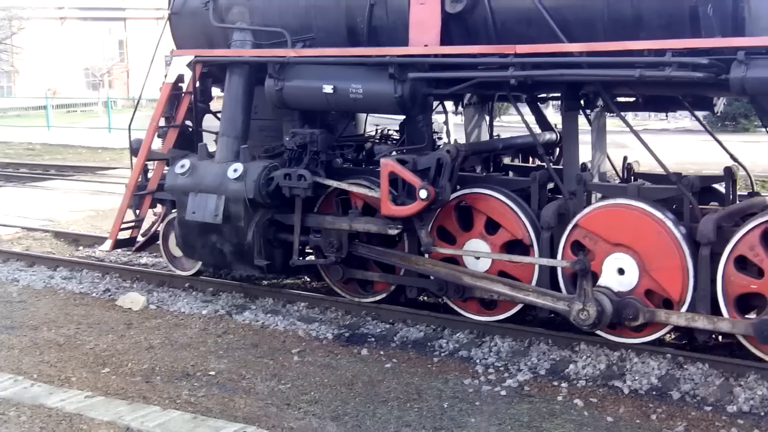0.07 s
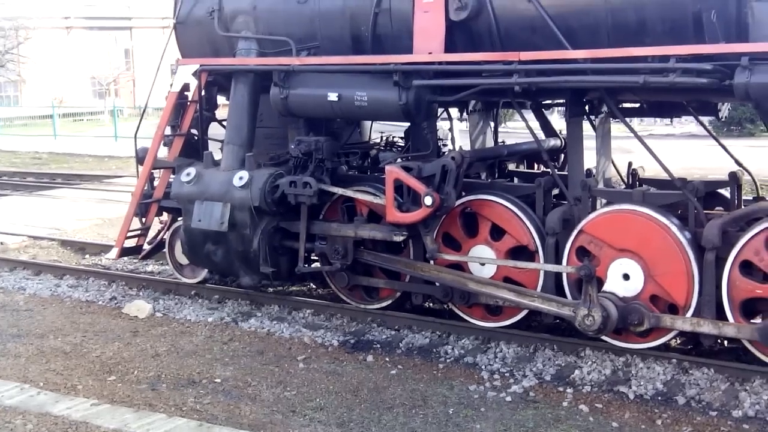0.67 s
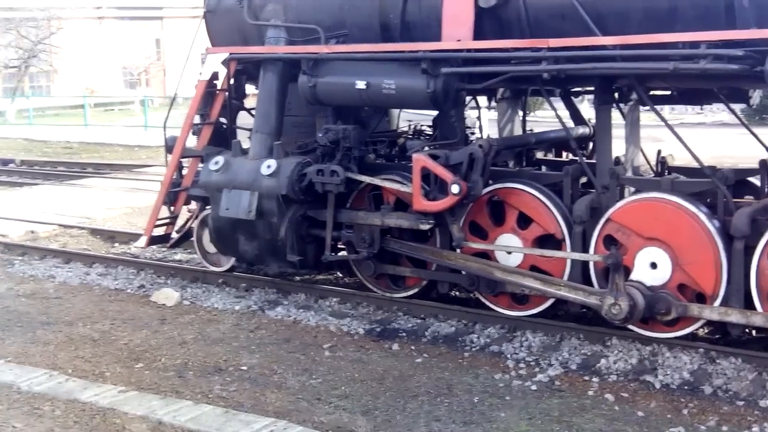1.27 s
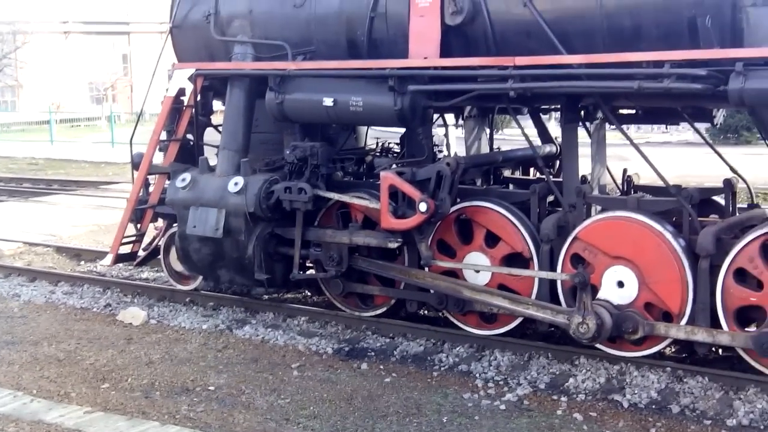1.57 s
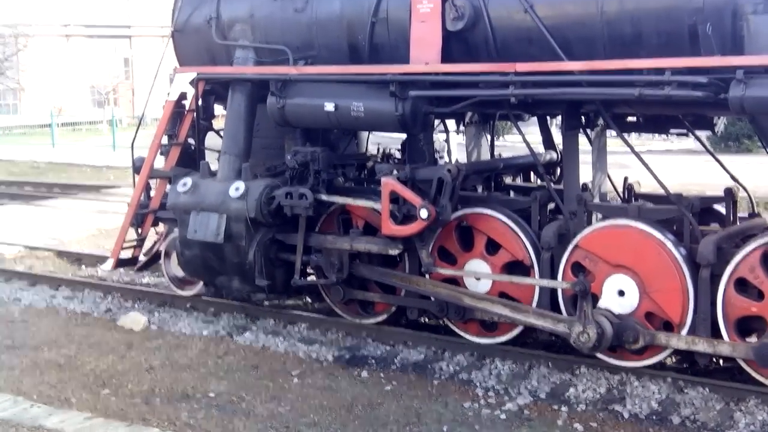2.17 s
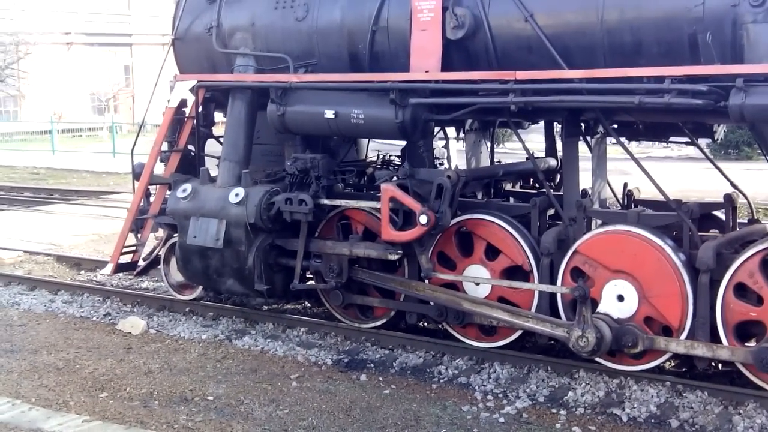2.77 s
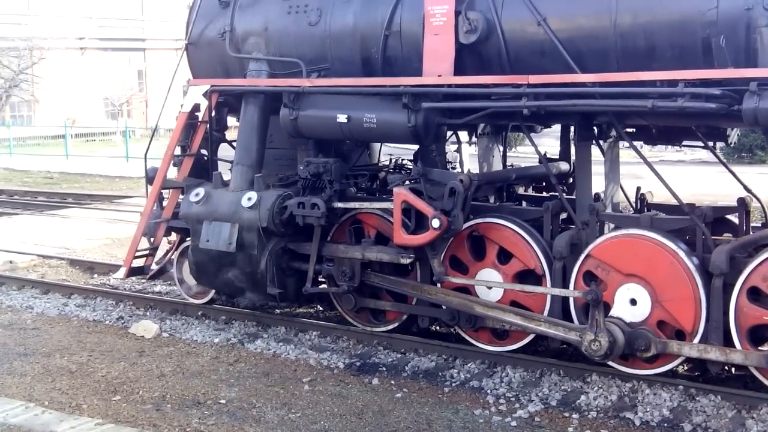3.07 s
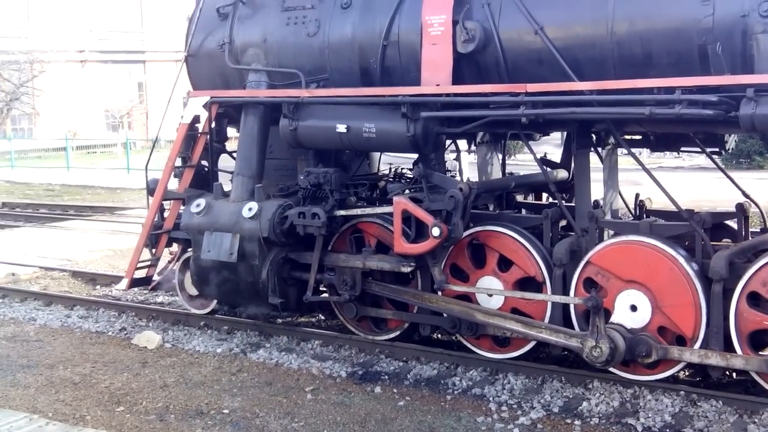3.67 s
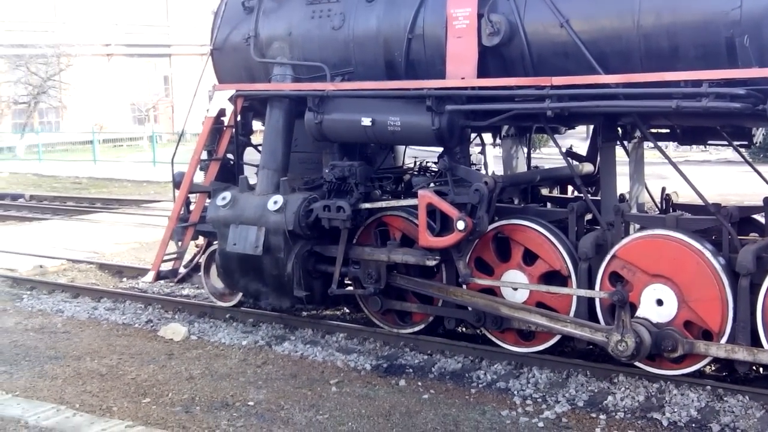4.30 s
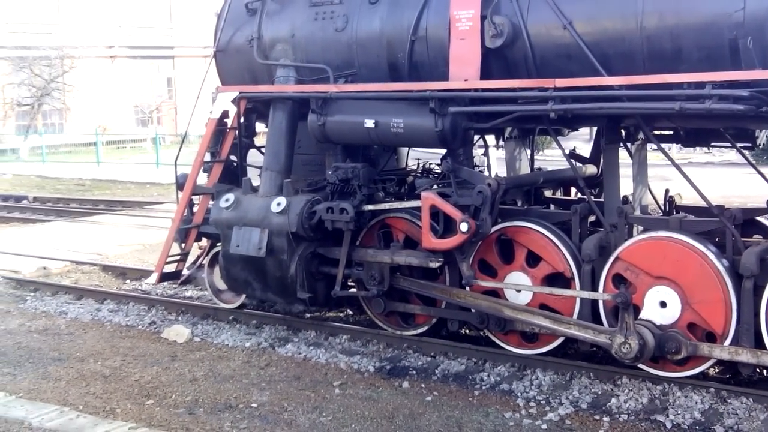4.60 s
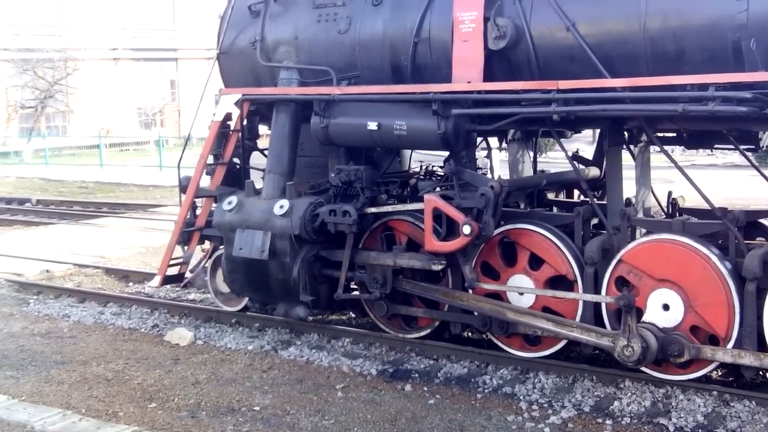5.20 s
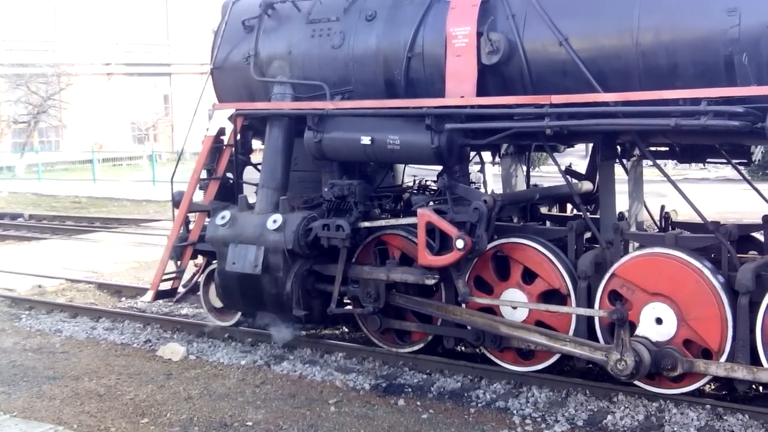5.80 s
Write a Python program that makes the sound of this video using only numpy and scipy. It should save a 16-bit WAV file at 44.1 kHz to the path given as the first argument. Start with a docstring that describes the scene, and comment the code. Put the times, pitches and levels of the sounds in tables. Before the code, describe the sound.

A sudden loud jet of steam from a locomotive eases and dies away to a thin leak, with a pump softly thumping behind.

```python
"""A thin hiss and a few spits, then a blast of steam from low by a standing locomotive's cylinders.
One microphone, outdoors, a few metres from the engine. The valve snaps open, eases back and closes
to a leak; the jet rings the pipe and frame and whistles briefly. Behind it the air pump works
steadily, a thump and a soft chuff of exhaust at each stroke, over the rumble of boiler and yard."""
import sys
import numpy as np
from scipy import signal
from scipy.fft import rfft, irfft
from scipy.io import wavfile
from scipy.ndimage import map_coordinates

SR = 44100
rng = np.random.default_rng(int(sys.argv[2]) if len(sys.argv) > 2 else 0)


def pcm_store(signal):
    """Save signal as 16-bit PCM."""
    levels = np.round(np.clip(np.atleast_2d(signal), -1, 1) * 32767)
    wavfile.write(sys.argv[1], SR, levels.astype(np.int16).T)


N = 257984
T = np.arange(N) / SR
HZ = np.maximum(np.arange(N // 2 + 1) * SR / N, 1)

# The valve snaps open, is eased back, starts to close and finally seats.
OPEN_S, EASE_S, CLOSE_S, SEAT_S = 1.2138, 2.38, 3.76, 4.73
# Air pump strokes. Each row: start in seconds, thump level in dB, thump pitch in Hz, chuff level in dB.
PUMP_STROKES = [(0.541, -50, 100, -48.5), (1.097, -40, 120.6, -54), (1.423, -34.5, 160.4, -47),
                (2.285, -43, 124, -50), (2.89, -40.5, 105, -52), (3.448, -38.5, 129, -48),
                (4.018, -45, 99.5, -45), (4.557, -36.5, 114.8, -48.5), (5.135, -46, 104.8, -44.5),
                (5.657, -35.5, 135.7, -50)]


def steam_jet(wide_db=-14.5, eased_db=-32, split_hz=4300):
    """Turbulent steam rings the pipe; its colour follows the valve opening and its pressure flutters."""
    # The jet with the valve wide open, then eased back. Each row: frequency in Hz, level in dB.
    wide_colour = [(150, -52), (330, -33.5), (420, -37), (600, -31), (900, -17.5), (1200, -11), (2100, -4),
                   (3500, -4.5), (4200, -7), (5300, -1), (6300, 0), (7400, -9.5), (8000, -19.5),
                   (8700, -29.5)]
    eased_colour = [(40, -37), (150, -28.5), (330, -15.5), (420, -22.5), (600, -11.5), (900, -15),
                    (1200, -11.5), (2100, -9), (3500, -9), (4200, -11.5), (5300, -2.5), (6300, -1.5),
                    (7400, 2.5), (8000, -12.5), (8700, -19.5)]
    # Resonances of pipe and frame. Each row: frequency in Hz, width in Hz, lift in dB.
    pipe_rings = [(470, 90, 13.5), (535, 45, 11), (680, 105, 14), (808, 110, 12.5), (995, 120, 9.8),
                  (1098, 44, 10.5), (1204, 62, 7.5), (1303, 34, 13.5), (1390, 150, 8.8), (1476, 18, 9.5),
                  (1556, 60, 11), (1699, 42, 10), (1885, 60, 11.5), (1941, 34, 9.8), (2085, 80, 12.8),
                  (2202, 40, 6.5), (2287, 26, 7), (2947, 36, 7.5), (3236, 110, 4.2), (3416, 28, 10.5),
                  (3630, 150, 6), (4188, 50, 5), (4775, 60, 3), (5170, 80, 5.5), (5812, 36, 5),
                  (6000, 32, 4.5), (6297, 24, 7.5), (6748, 45, 5.5), (7438, 28, 5.5)]
    roar_db = roar_level()
    opening = np.clip((roar_db - eased_db) / (wide_db - eased_db), 0, 1)
    hiss_db = roar_db - 3.5 * opening + 0.46 * (1 - opening)
    eddies = turbulence(flicker_db=0.5, flicker_hz=7.6, spatter=0.024)
    lowpass = 1 / (1 + (HZ / split_hz) ** 16)
    steam = 0
    for points, share in ((wide_colour, opening), (eased_colour, 1 - opening)):
        gain = colour(points, pipe_rings)
        roar = unit(shape(eddies, gain * lowpass))
        hiss = unit(shape(eddies, gain * (1 - lowpass)))
        steam = steam + share * (undb(roar_db) * roar + undb(hiss_db) * hiss)
    # The steam's heat wavers, and all the resonances with it.
    wavering_clock = np.cumsum(1 + 0.00186 * wander(4.03))
    steam = map_coordinates(steam, [wavering_clock], order=3, mode="nearest")
    build_db = 22 * (ramp(OPEN_S, 0.042) - 1)
    flutter_db = 0.26 * wander(28)
    return steam * valve_open() * undb(build_db + flutter_db)


def roar_level(blast_db=-12.5, trickle_db=-49.5, sag_db_per_s=4, close_db_per_s=40):
    """The roar in dB: it sags with the pipe pressure, drops when eased, recovers a little, then fades."""
    sag = sag_db_per_s * (np.clip(T, OPEN_S, EASE_S) - OPEN_S)
    ease = 11.5 * (1 - np.exp(-np.maximum(T - EASE_S, 0) / 0.24))
    recover = 2 * ramp(CLOSE_S - 0.26, 0.26)
    close = close_db_per_s * np.maximum(T - CLOSE_S, 0)
    return 20 * np.log10(undb(blast_db - sag - ease + recover - close) + undb(trickle_db))


def valve_open(opening_s=0.0082, seating_s=0.045):
    """1 while the valve lets the jet out, 0 while it is seated."""
    return ramp(OPEN_S, opening_s) * (1 - ramp(SEAT_S - seating_s, seating_s))


def turbulence(flicker_db, flicker_hz, spatter):
    """Eddies make each octave flicker on its own; water drops in the steam add a fine spatter."""
    rush = rng.standard_normal(N) * np.exp(spatter * wander(400))
    octave = np.clip(np.log2(HZ / 500), 0, 4)
    bands = (shape(rush, np.maximum(1 - abs(octave - k), 0)) for k in range(5))
    return unit(sum(band * undb(flicker_db * wander(flicker_hz)) for band in bands))


def whistles(waver=0.0041):
    """Brief, wavering whistles in the blast, and one thin, faint chirp after it."""
    # Each row: loudest moment in seconds, pitch in Hz, level in dB, length in seconds.
    tones = [(1.283, 1957, -15, 0.029), (2.947, 3540, -33, 0.031), (3.035, 1320, -33.5, 0.076),
             (3.112, 3440, -33.5, 0.037), (3.214, 702, -28, 0.022), (3.437, 1310, -23.5, 0.017),
             (3.776, 1904, -33.5, 0.042), (5.586, 2697, -45, 0.05)]
    clock = np.cumsum(1 + waver * wander(60)) / SR
    out = 0
    for peak_s, hz, db, length in tones:
        swell = np.exp(-2 * ((T - peak_s) / length) ** 2)
        out = out + undb(db) * swell * np.sqrt(2) * np.sin(2 * np.pi * hz * clock)
    return out


def leak(before_db=-57.5, after_db=-44.5):
    """Steam slips past the valve seat in a thin, high hiss, stronger once the valve has been opened."""
    # Colour of the hiss. Each row: frequency in Hz, level in dB.
    leak_colour = [(300, -9.5), (800, -5), (1400, -8.5), (2100, -4), (2450, -7), (3500, -6.5), (4200, -5.5),
                   (5400, -4.5), (6100, -5), (6800, 0.5), (7400, -1), (8000, -14.5), (8700, -21)]
    # Its resonances. Each row: frequency in Hz, width in Hz, lift in dB.
    leak_rings = [(1410, 100, 10), (1930, 130, 4.9), (3670, 90, 7.7), (5200, 70, 4), (5350, 130, 5.3),
                  (6450, 170, 9.5), (6670, 87, 4), (7100, 95, 8.2)]
    eddies = turbulence(flicker_db=0.7, flicker_hz=7.3, spatter=0.066)
    hiss = unit(shape(eddies, colour(leak_colour, leak_rings)))
    return hiss * undb(np.where(T < OPEN_S, before_db, after_db))


def spits(width_hz=1200):
    """Short, bright bursts of hiss; the first is a sharp "tss" as the sound begins."""
    # Each row: start in seconds, level in dB, rise and decay in seconds, centre in Hz.
    bursts = [(.163, -38, 0.0004, 0.025, 5400), (.499, -41, 0.012, .022, 6740),
              (.54, -43.5, 0.038, 0.091, 6440), (1.061, -47, 0.041, 0.3, 6220),
              (5.103, -39, 0.0051, 0.035, 6800)]
    return sum(undb(db) * puff(start, rise, decay) * ringing_hiss(hz, width_hz)
               for start, db, rise, decay, hz in bursts)


def pump_thumps(rise_s=0.019, fade_s=0.083, boom_share=0.49):
    """Behind the jet, each stroke shakes the pump body into a rough, dull clunk."""
    body = colour([(25, -49), (55, -26), (90, -2), (220, 4), (340, -2.5), (900, -17.5)])
    clock = np.cumsum(1 + 0.152 * wander(49)) / SR
    out = 0
    for start, db, hz, _ in PUMP_STROKES:
        age = np.maximum(T - start, 0)
        envelope = ramp(start, rise_s) * np.exp(-(age / fade_s) ** 2)
        boom = np.sin(2 * np.pi * hz * clock)
        rumble = noise(body * np.sqrt(resonance(hz, 1.3 * hz)))
        out = out + undb(db) * envelope * (boom_share * boom + (1 - boom_share) * rumble)
    return out


def pump_exhaust():
    """The pump lets out spent steam: a chuff at each stroke and a few long, soft wafts."""
    # Colour of the exhaust. Each row: frequency in Hz, level in dB.
    exhaust_colour = [(30, -29), (100, -8), (400, -9), (800, -3), (1300, -3.5), (2100, -10.5), (2600, -14),
                      (3400, -14.5), (4500, -19.5), (8000, -29.5)]
    # Wafts between strokes. Each row: start in seconds, level in dB.
    soft_wafts = [(.28, -53.5), (0.964, -53)]
    chuffs = sum(undb(db) * puff(start, rise_s=0.024, decay_s=0.14) for start, _, _, db in PUMP_STROKES)
    wafts = sum(undb(db) * puff(start, rise_s=0.03, decay_s=0.44) for start, db in soft_wafts)
    return (chuffs + wafts) * noise(colour(exhaust_colour))


def pump_squeaks(width_hz=57, rise_share=0.35):
    """Now and then the pump squeaks, ringing at one narrow resonance."""
    # Each row: start in seconds, level in dB, pitch in Hz, decay in seconds.
    squeaks = [(.497, -34, 6080, 0.031), (.555, -47.5, 3250, 0.073), (.56, -47.5, 1980, 0.091),
               (5.16, -46.5, 890, 0.068), (5.66, -45, 790, 0.017), (5.695, -41, 1135, 0.035),
               (5.735, -47.5, 1440, 0.041)]
    return sum(undb(db) * puff(start, rise_share * decay, decay) * ringing_hiss(hz, width_hz)
               for start, db, hz, decay in squeaks)


def reflections(x, count=14, delay_s=(0.002, 0.018), echo_db=-8):
    """The engine's flank, the wheels and the ballast throw sound back with a steely comb colour."""
    lags = rng.uniform(*delay_s, count)
    signs = rng.choice([-1, 1], count)
    echo = sum(sign * np.interp(T - lag, T, x, left=0) for lag, sign in zip(lags, signs))
    strength = undb(echo_db)
    return (x + strength * echo / np.sqrt(count)) / np.sqrt(1 + strength ** 2)


def yard(idle_db=-58.5, jet_rumble_db=-54, swell_db=0.5):
    """Low, uneven rumble of the simmering boiler and open yard; the jet adds to it until the valve seats."""
    # Colour of the rumble. Each row: frequency in Hz, level in dB.
    yard_colour = [(25, -37.5), (55, -22.5), (88, 0.5), (150, -3), (270, 0), (400, -13.5), (900, -17),
                   (2000, -16.5), (8000, -51)]
    flow = valve_open() * (1 - ramp(CLOSE_S, SEAT_S - CLOSE_S))
    strength = np.sqrt(undb(idle_db) ** 2 + flow * undb(jet_rumble_db) ** 2)
    return noise(colour(yard_colour)) * strength * undb(swell_db * wander(5.1))


def ringing_hiss(hz, width_hz, skirt_db=-30, top_hz=7600):
    """Noise with one resonance standing over a broad skirt."""
    ceiling = 1 / (1 + (HZ / top_hz) ** 40)
    return noise((np.sqrt(resonance(hz, width_hz)) + undb(skirt_db)) * ceiling)


def puff(start_s, rise_s, decay_s):
    """An envelope that builds up evenly, then dies away."""
    return ramp(start_s, rise_s) * np.exp(-np.maximum(T - start_s - rise_s, 0) / decay_s)


def ramp(start_s, length_s):
    """An even rise from 0 to 1."""
    return np.clip((T - start_s) / length_s, 0, 1)


def wander(rate_hz):
    """Random drift with a spread of 1, mostly slower than the given rate."""
    return noise(1 / (1 + (HZ / rate_hz) ** 4))


def noise(gain):
    """Coloured noise of rms 1."""
    return unit(shape(rng.standard_normal(N), gain))


def colour(points, rings=()):
    """Gain at every frequency: a slope through (Hz, dB) points, lifted by resonances."""
    hz, db = np.transpose(points)
    slope_db = np.interp(np.log(HZ), np.log(hz), db)
    return undb(slope_db + sum(lift * resonance(centre, width) for centre, width, lift in rings))


def resonance(hz, width_hz):
    """Power response of one resonance."""
    return 1 / (1 + (2 * (HZ - hz) / width_hz) ** 2)


def shape(x, gain):
    """Filter by a gain at every frequency."""
    return irfft(rfft(x) * gain, N)


def unit(x):
    """Scale to rms 1."""
    return x / np.sqrt(np.mean(x ** 2))


def undb(db):
    """Decibels to gain."""
    return 10 ** (np.asarray(db) / 20)


def scene():
    """All sources at one microphone, a few metres from the engine."""
    foreground = steam_jet() + whistles()
    small_sounds = reflections(leak() + spits() + pump_squeaks())
    return (foreground + small_sounds + pump_exhaust() + pump_thumps() + yard())[None]


def record(dry, start_s=0.161, peak=0.95, top_hz=8780):
    """The sound starts after a moment of silence; the highest peaks are rounded and the top is cut."""
    rounded = dry / (1 + (dry / peak) ** 12) ** (1 / 12)
    steep_lowpass = signal.ellip(8, 0.1, 50, top_hz, fs=SR, output="sos")
    return signal.sosfiltfilt(steep_lowpass, rounded * (T >= start_s))


dry = scene()
out = record(dry)
pcm_store(out)
```